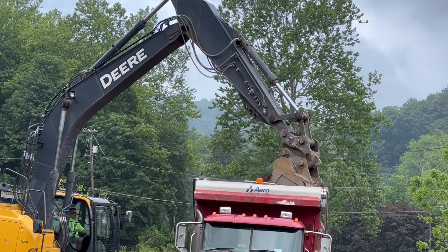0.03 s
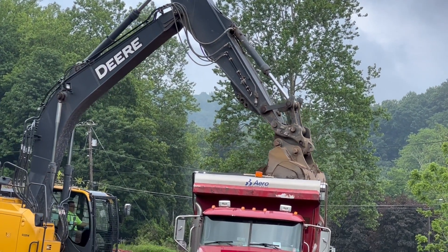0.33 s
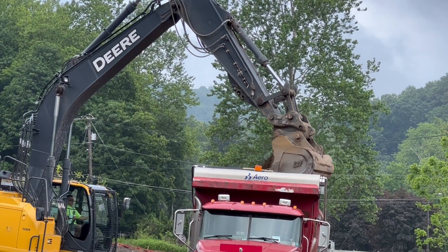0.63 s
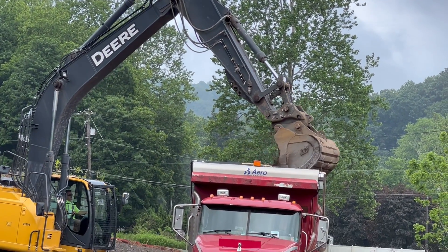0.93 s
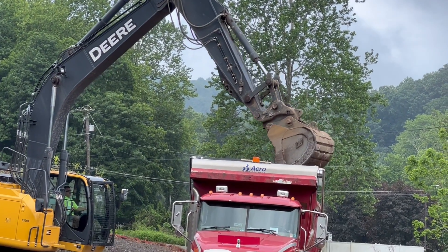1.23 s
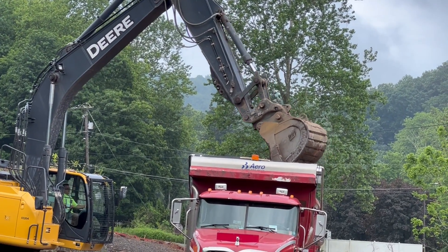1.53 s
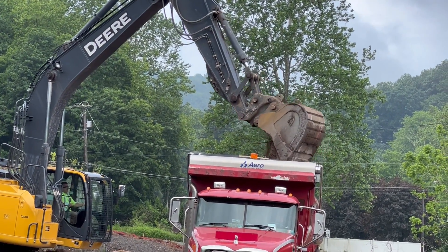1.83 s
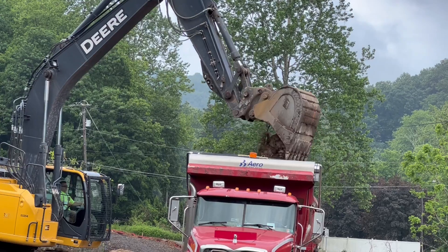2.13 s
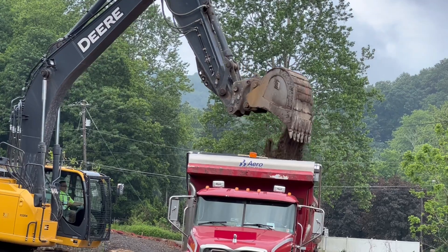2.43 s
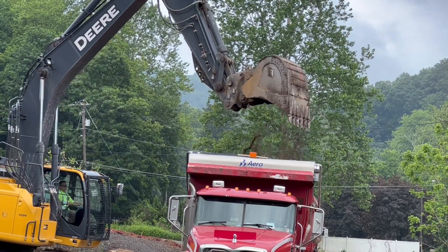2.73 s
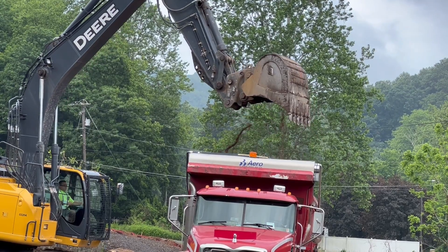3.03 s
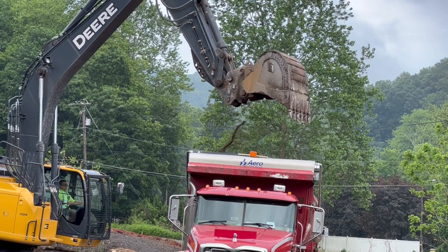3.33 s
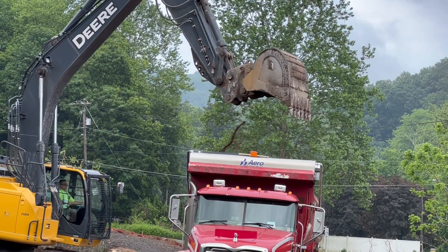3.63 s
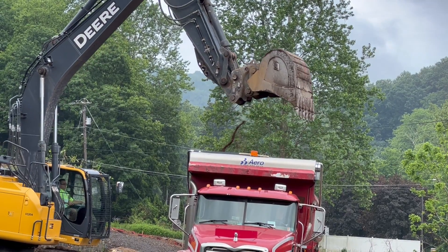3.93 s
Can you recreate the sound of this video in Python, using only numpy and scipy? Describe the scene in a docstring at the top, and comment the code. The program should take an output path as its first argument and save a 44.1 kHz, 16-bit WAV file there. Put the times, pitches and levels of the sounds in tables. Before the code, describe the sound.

An excavator empties dirt into a dump truck outdoors, some way off, over steady diesel engines and a hydraulic whine. At about 1 second clods thud into the steel bed, followed by scattered stone clicks. From 2.7 seconds the bucket clanks and rattles with a thin jingle while the last soil pours with more thuds. The whine weakens, the clanking ends near 3.4 seconds and the pour fades by 4.

```python
"""An excavator empties its bucket into a dump truck, heard from some way off, straight ahead.
Clods thud into the steel bed and stones click on it; then the bucket swings fully open, clanks and
rattles on its pins, and the last soil pours out. Behind it both diesels run and the hydraulic pump
whines under the load. Outdoors, with a faint return from the trees, on a two-port stereo microphone."""
import sys
import numpy as np
from scipy import signal
from scipy.fft import rfft, irfft
from scipy.io import wavfile
from scipy.ndimage import map_coordinates

SR = 44100
rng = np.random.default_rng(int(sys.argv[2]) if len(sys.argv) > 2 else 0)


def store_pcm(level_fs):
    """Save levels as 16-bit WAV."""
    pcm = np.round(np.clip(level_fs, -1, 1) * 32767).astype(np.int16)
    wavfile.write(sys.argv[1], SR, np.atleast_2d(pcm).T)


N = 4 * SR
TIME, HIT_TIME = np.arange(N) / SR, np.arange(SR * 3 // 4) / SR
GRAINS_PER_S = 2500


def amp(db):
    """Decibels to gain."""
    return 10 ** (np.asarray(db) / 20)

def unit(x):
    """Scales to rms 1."""
    return x / np.sqrt(np.mean(x ** 2) + 1e-20)

def unit_hit(x):
    """Scales a hit to the energy of 30 ms at rms 1."""
    return x / np.sqrt(np.sum(x ** 2) / (.03 * SR) + 1e-20)

def curve(rows, column=1):
    """One column of a time table, for every sample."""
    rows = np.array(rows)
    return np.interp(TIME, rows[:, 0], rows[:, column])

def add(mix, start, sound):
    """Mixes a sound in, start seconds from the beginning."""
    part = mix[round(start * SR):][:len(sound)]
    part += sound[:len(part)]

def shape(x, gain_db):
    """Minimum-phase filter that follows gain_db(Hz)."""
    size = 8192
    hz = abs(np.fft.fftfreq(size, 1 / SR)) + 1
    log_gain = np.log(amp(np.maximum(gain_db(hz), -100)))
    taps = np.fft.ifft(np.exp(np.conj(signal.hilbert(log_gain)))).real[:size // 2]
    return signal.fftconvolve(x, taps)[:len(x)]

def colour(x, points):
    """Filters by a table of (Hz, dB)."""
    hz, db = np.transpose(points)
    return shape(x, lambda f: np.interp(np.log(f), np.log(hz), db))

def resonate(x, hz, octaves):
    """One resonance with steep skirts."""
    return shape(x, lambda f: -20 * np.log10(1 + (np.log2(f / hz) / octaves / 2) ** 2 * 2))

def drift(per_s):
    """Smooth random wander of rms 1."""
    knots = rng.standard_normal(400)
    return unit(map_coordinates(knots, [TIME * per_s + 10], order=3, mode="wrap"))

def grains(size, per_s):
    """Random clicks of uneven strength."""
    clicks = (rng.random(size) < per_s / SR) * rng.choice([-1, 1], size)
    return clicks * amp(3 * np.minimum(rng.exponential(1, size), 4))

def fade(rise_s, t60):
    """Linear rise, then a fall of 60 dB in t60 seconds."""
    decay = np.exp(-np.log(1000) * np.maximum(HIT_TIME - rise_s, 0) / t60)
    return np.minimum(HIT_TIME / rise_s, 1) * decay

def burst(rise_s, t60):
    """A short, dying shower of tiny contacts."""
    return grains(len(HIT_TIME), GRAINS_PER_S) * fade(rise_s, t60)

def ring(modes, rise_s=.007):
    """The modes of a steel body after one blow."""
    return unit_hit(sum(amp(db) * fade(rise_s, t60) * np.sin(2 * np.pi * (hz * HIT_TIME + rng.random()))
                        for hz, db, t60 in modes))

def tone(hz, waver_hz=1.34, waver_db=2):
    """A machine tone that wavers in pitch and level."""
    level = np.sqrt(2) * amp(waver_db * drift(9.8))
    cycles = np.cumsum(hz + waver_hz * drift(12)) / SR
    return level * np.sin(2 * np.pi * (cycles + rng.random()))


def tree_echo(x):
    """A dull, faint return from the trees."""
    tail = colour(burst(rise_s=.084, t60=.5), [(100, -14.5), (1000, -11.5), (4000, -19.5), (10000, -15.5)])
    return amp(-22) * signal.fftconvolve(x, tail / np.linalg.norm(tail))[:N]


# The diesels' steady tones. Each row: pitch in Hz, level in dB.
ENGINE_TONES = [(49.8, -27.5), (84, -34.5), (151.8, -26.5), (167.5, -40.5), (186, -36.5), (209.5, -36),
                (250.5, -36), (641, -53.5)]
# Roar of engines and fans. Each row: frequency in Hz, relative level in dB.
ROAR_SPECTRUM = [(21, -25), (34, -47), (45.5, -10), (81, 1.9), (116, 0.8), (181, -6), (241, -7.5),
                 (322, -15.5), (452, -19), (562, -26), (802, -18.5), (1255, -21.5), (1905, -24.6),
                 (2405, -29.5), (3405, -32), (4805, -43), (8305, -45), (9505, -49.5), (12005, -41),
                 (15505, -49)]
# The roar's treble over time. Each row: time in seconds, gain in dB.
ROAR_TREBLE = [(0, -0.1), (.9, 0.8), (2, 2), (2.6, 0.2), (3.3, -0.6), (4, 0.7)]

def engines(firing_hz=41.8):
    """Two diesels some way off: tones over a roar whose low end throbs with the firing."""
    throb = 1 + .48 * np.sin(2 * np.pi * np.cumsum(firing_hz + 2.83 * drift(8)) / SR)
    roar = unit(colour(rng.standard_normal(N), ROAR_SPECTRUM))
    low = signal.sosfilt(signal.butter(1, 700, fs=SR, output="sos"), roar)
    flicker = amp(curve(ROAR_TREBLE) + .88 * drift(70))
    hum = sum(amp(db) * tone(hz) for hz, db in ENGINE_TONES)
    return amp(-24.6) * (low * throb + (roar - low) * flicker) + hum


# The pump under load. Each row: time in seconds, pitch in Hz, then whine, upper whine and hiss in dB.
PUMP_LOAD = [(0, 416, -32.5, -46, -47.2), (.12, 416.8, -32.5, -46, -47.2), (.4, 417.8, -33.5, -43, -65),
             (.7, 419.1, -34, -46, -55), (.95, 419.8, -32, -40.5, -45.5), (1.25, 421.1, -35, -36, -49),
             (1.5, 420.2, -33.5, -32.5, -53), (1.7, 420.5, -32, -35.5, -52),
             (1.95, 421.1, -31.5, -47.2, -50), (2.27, 421.1, -34.8, -48, -49.2),
             (2.5, 422.7, -38.8, -46, -60), (3.2, 416.2, -48, -60.2, -70.2),
             (4, 414.3, -41.2, -46.2, -74.2)]
# Oil in the valves. Each row: frequency in Hz, relative level in dB.
OIL_SPECTRUM = [(5500, -43), (7000, -5), (7700, -18), (8200, 1), (8800, -12.5), (10000, -8.5)]

def hydraulics():
    """Two fluttering pump whines, the upper with a partial a fifth above; oil hisses and whistles."""
    hz, whine_db, upper_db, hiss_db = (curve(PUMP_LOAD, column) for column in range(1, 5))
    hz = hz + 3.49 * drift(46)
    flow = rng.standard_normal(N)
    whistle = amp(-9.5) * unit(resonate(flow, hz=8190, octaves=.012))
    oil = unit(colour(flow, OIL_SPECTRUM)) + whistle
    upper_hz = 1.143 * hz
    upper_whine = tone(upper_hz) + amp(-6) * tone(1.5 * upper_hz)
    return amp(whine_db) * tone(hz) + amp(upper_db) * upper_whine + amp(hiss_db) * oil


# A thin high tinkle near 11.5 kHz while the bucket clanks. Each row: time in seconds, level in dB.
SIZZLE_LEVEL = [(2.65, -88), (2.668, -41), (2.78, -38.5), (2.92, -45), (3.03, -42), (3.15, -49),
                (3.24, -44), (3.28, -62), (3.44, -61), (3.55, -76), (3.7, -58), (3.8, -76), (4, -65)]

def high_sizzle(hz=11520):
    """A thin tinkle near 11.5 kHz, in quick flickers, with some sizzle around it."""
    tink = rng.standard_normal(len(HIT_TIME)) * fade(rise_s=1 / SR, t60=.06)
    shake = signal.fftconvolve(grains(N, per_s=400), tink)[:N]
    tinkle = unit(resonate(shake, hz, octaves=.018))
    sizzle = amp(-7) * unit(resonate(shake, hz, octaves=.09))
    return amp(curve(SIZZLE_LEVEL)) * (tinkle + sizzle)


# The last soil leaving the bucket. Each row: time in seconds, level in dB.
POUR_LEVEL = [(2.66, -29), (2.75, -18.5), (2.92, -20), (3.1, -19), (3.3, -26), (3.5, -26.5), (3.7, -30),
              (4, -35)]
# Loose soil landing. Each row: frequency in Hz, relative level in dB.
SOIL_SPECTRUM = [(40, 5.5), (65, 5), (150, -3), (420, 0.5), (700, -3), (1100, -8.5), (2000, -20.5),
                 (4500, -32), (7000, -37), (12000, -45)]

def soil_pour():
    """Soil patters in clumps onto the heap in the truck."""
    patter = grains(N, GRAINS_PER_S) * amp(2 * drift(45))
    return amp(curve(POUR_LEVEL)) * unit(colour(patter, SOIL_SPECTRUM))


# Stones striking the bed. Each row: start in seconds, level in dB, pitch in Hz,
# bandwidth in octaves, t60 of the contact in seconds.
STONE_HITS = [(1.066, -27, 590, 0.065, 0.064), (1.183, -28, 792, 0.045, .07),
              (1.627, -30, 1720, 0.12, 0.04), (1.628, -30, 1080, 0.33, .05),
              (1.917, -38, 1770, 0.077, 0.039), (1.967, -27.5, 990, 0.18, 0.004),
              (2.059, -33.5, 1095, 0.41, 0.026), (2.103, -40, 1207, 0.22, 0.022),
              (2.185, -39, 1770, 0.069, 0.02), (2.251, -31.5, 720, 0.067, 0.057),
              (2.253, -35, 1530, 0.14, 0.029), (2.441, -35, 1860, 0.077, 0.056),
              (2.451, -27, 830, 0.28, 0.045), (2.451, -31.5, 397, 0.15, .03), (2.533, -40, 1840, .1, 0.022),
              (2.568, -28, 960, 0.35, 0.18), (2.609, -30.5, 1830, 0.061, 0.046),
              (2.611, -28.5, 1150, 0.25, 0.058), (2.612, -26, 730, 0.074, .05),
              (3.03, -21.5, 630, 0.036, 0.071), (3.101, -23.5, 925, 0.013, 0.16),
              (3.197, -31.5, 820, 0.11, 0.049), (3.592, -31, 1980, .09, 0.067),
              (3.688, -34.5, 940, 0.32, 0.065)]

def stones():
    """Dry clicks on steel, each with one resonance, their top lost on the way to the microphone."""
    out = np.zeros(N)
    distance = signal.butter(6, 2530, fs=SR, output="sos")
    for start, db, hz, octaves, t60 in STONE_HITS:
        click = resonate(burst(.00061, t60), hz, octaves)
        add(out, start, amp(db) * unit_hit(signal.sosfilt(distance, click)))
    return out


def thud(hz, octaves=.51, steepness=27.6):
    """The dull push of a soft lump; heavier lumps are deeper."""
    push = burst(rise_s=.006, t60=.125)
    dull = shape(push, lambda f: -steepness * np.log10(1 + (np.log2(f / hz) / octaves / 2) ** 4 * 2))
    return unit_hit(dull)


# Clods landing. Each row: start in seconds, thud in dB, thud pitch in Hz, boom in dB, crumble in dB.
CLOD_HITS = [(1.062, -34, 130, -38, -31), (1.068, -12.3, 104, -25, -24.5), (1.091, -9.5, 141, -27, -21.5),
             (1.118, -17, 200, -12, -21.5), (1.147, -31, 130, -17.5, -29), (1.178, -23, 170, -28, -31),
             (1.235, -15, 106, -20.5, -33), (1.268, -20.5, 191, -22, -42), (1.321, -30, 130, -22.5, -28.5),
             (1.359, -22.5, 101, -36, -38), (1.905, -21, 130, -43, -37), (1.93, -22, 158, -44, -48),
             (2.261, -24, 111, -31, -47), (2.679, -27, 130, -25, -28), (2.719, -18.5, 145, -28, -34),
             (2.818, -19, 130, -18, -24), (2.918, -17, 149, -14, -30.5), (2.986, -20.5, 168, -24, -31),
             (3.005, -13.5, 62, -22, -25), (3.185, -23, 110, -30, -31)]
# The truck's steel bed. Each row: mode in Hz, relative level in dB, t60 in seconds.
BED_MODES = [(107, -3.5, 0.1), (192.3, -0.5, 0.21), (273.2, -5, 0.36), (314, -2.5, 0.15), (522, -28, 0.31),
             (701, -27, 0.41), (780, -27, 0.24)]
# A clod breaking, and the grit it sheds. Each row: frequency in Hz, relative level in dB.
CRUMBLE_SPECTRUM = [(201, -16), (401, -9.2), (561, 3.5), (901, -5), (1301, -2.1), (1551, -9.5),
                    (1801, -5.5), (2501, -16.5), (4501, -31), (8001, -37), (12001, -43.1), (16001, -61.1)]
GRIT_SPECTRUM = [(1500, -5), (3000, 1.5), (4500, -8), (7500, -10), (12000, -21), (16000, -34)]

def clods():
    """Each clod thuds, sets the bed booming, breaks up and sheds a trickle of grit."""
    out = np.zeros(N)
    for start, thud_db, thud_hz, boom_db, crumble_db in CLOD_HITS:
        add(out, start, amp(thud_db) * thud(thud_hz))
        add(out, start, amp(boom_db) * ring(BED_MODES))
        crumble = unit_hit(colour(burst(rise_s=.015, t60=.125), CRUMBLE_SPECTRUM))
        grit = unit_hit(colour(burst(rise_s=.015, t60=1), GRIT_SPECTRUM))
        add(out, start, amp(crumble_db) * (crumble + amp(-17) * grit))
    return out


# The bucket knocking on its stop and pins. Each row: start in seconds, then body, clang and clash in dB.
BUCKET_KNOCKS = [(2.659, -22, -20, -45), (2.672, -12, -19, -34), (2.725, -15, -12.5, -32),
                 (2.753, -14.2, -20, -35.5), (2.775, -31, -21, -46), (2.802, -26, -19, -37),
                 (2.812, -19.5, -17, -21.5), (2.843, -20, -23, -39), (2.866, -35, -23, -34.5),
                 (2.892, -18, -33, -56), (2.956, -23, -24, -41), (3.005, -39, -21, -37),
                 (3.027, -17.5, -22, -46), (3.083, -23, -22, -45), (3.111, -22, -33, -40.5),
                 (3.18, -24.5, -32, -51), (3.202, -25.5, -41, -56), (3.25, -32, -30.5, -49),
                 (3.328, -23.5, -35, -58), (3.397, -29, -30, -60)]
# The bucket's body, and its pins. Each row: mode in Hz, relative level in dB, t60 in seconds.
BUCKET_MODES = [(345, -10.5, 0.21), (391.3, -7, 0.37), (410, -0.5, 0.24), (431.4, -7.5, 0.22),
                (475.5, -9.5, 0.2), (529, -8.5, 0.2), (636, -13.5, 0.3), (755, -19, 0.46),
                (814, -19.5, 0.22), (909, -22, 0.21), (1056, -24, 0.18), (1170, -24, 0.29),
                (1218, -19, 0.098), (1770, -22, 0.33)]
PIN_MODES = [(3352, -4, 0.23), (3530, -6, .18), (3910, 0, 0.16), (4150, 1, 0.17), (4310, 2, 0.18),
             (5606, 3, 0.13), (5905, 0, 0.12), (6140, -5, .1), (6702, -2, .11), (6850, -3, 0.1)]
# The plates' clang, and the bright clash above it. Each row: frequency in Hz, relative level in dB.
CLANG_SPECTRUM = [(151, -18.5), (301, 6.5), (521, 6), (751, 0.5), (1301, -1.8), (1901, -4.2), (2701, -11),
                  (3501, -16), (4801, -35), (9001, -41)]
CLASH_SPECTRUM = [(1500, -2.5), (2800, -9), (3500, 3), (4300, -2), (4800, -5.5), (5900, 1.5), (6900, 1),
                  (8000, -9), (9300, -15.5), (12000, -18), (16000, -33)]

def bucket(rise_s=.003):
    """A strike and its chatter ring the bucket's low modes, its plates and its pins."""
    out = np.zeros(N)
    for start, body_db, clang_db, clash_db in BUCKET_KNOCKS:
        contact = burst(rise_s, t60=.04)
        add(contact, rise_s, amp([-3.5]) * np.linalg.norm(contact))  # the strike, at the chatter's peak
        clang = signal.fftconvolve(contact, burst(rise_s, t60=.13))[:len(HIT_TIME)]
        clash = signal.fftconvolve(contact, burst(rise_s, t60=.085))[:len(HIT_TIME)]
        add(out, start, amp(body_db) * ring(BUCKET_MODES))
        add(out, start, amp(clang_db) * unit_hit(colour(clang, CLANG_SPECTRUM)))
        pins = amp(-9) * ring(PIN_MODES)
        add(out, start, amp(clash_db) * (unit_hit(colour(clash, CLASH_SPECTRUM)) + pins))
    return out


def scattered(x):
    """Sound scattered around the site: the same spectrum with its phases jumbled."""
    spectra = signal.stft(x, nperseg=512)[2]
    jumbled = spectra * np.exp(2j * np.pi * rng.random(spectra.shape))
    return signal.istft(jumbled, nperseg=512)[1][:N] * np.sqrt(2)


# Phase between the microphone's ports. Each row: frequency in Hz, lead of the left port in radians.
LEFT_LEAD = [(1000, 0), (2300, .2), (3200, .7), (4500, .45), (5500, 0), (8600, 0), (9100, -1.5),
             (10050, -3.1), (10330, -3.17), (11000, -4.6), (11850, -6.25), (12400, -6.35), (13000, -7.9),
             (13250, -9.4), (14350, -9.45), (14800, -11.2), (15250, -12.55)]

def microphone_ports(x):
    """Two ports hear one sound with a difference in phase that grows in the top treble."""
    hz, radians = np.transpose(LEFT_LEAD)
    lead = np.interp(np.log(np.fft.rfftfreq(N, 1 / SR) + 1), np.log(hz), radians)
    turn = np.exp(.5j * lead)  # half to each port
    return irfft(rfft(x) * np.array([turn, turn.conj()]), N)


# Scattered sound reaching the microphone from the sides. Each row: frequency in Hz, gain in dB.
SIDE_GAIN = [(30, -36), (60, -27), (125, -18), (250, -15.5), (1000, -15.5), (2000, -14), (5000, -19),
             (8000, -15), (12000, -13)]

def scene():
    """Both machines stand straight ahead of the microphone; scattered sound gives a little width."""
    dumping = clods() + stones() + bucket() + soil_pour()
    mid = dumping + tree_echo(dumping) + high_sizzle() + engines() + hydraulics()
    side = colour(scattered(mid), SIDE_GAIN)
    return microphone_ports(mid) + np.array([side, -side])


# The microphone's response, dull at the top. Each row: frequency in Hz, gain in dB.
MIC_RESPONSE = [(9000, -2), (9600, -0.5), (10200, -2.5), (11000, -6), (12000, -13), (13000, -17),
                (14000, -13), (15000, -11)]

def record(dry, low_cut_hz=55, ceiling=.88, top_hz=15800):
    """Microphone colour, low cut, soft overload, then the band limit."""
    heard = np.array([colour(channel, MIC_RESPONSE) for channel in dry])
    heard = signal.sosfilt(signal.butter(4, low_cut_hz, "high", fs=SR, output="sos"), heard)
    heard = heard / (1 + (heard / ceiling) ** 8) ** (1 / 8)
    band_limit = signal.firwin(511, top_hz, window=("kaiser", 9), fs=SR)
    return signal.oaconvolve(heard, band_limit[None], "same")


dry = scene()
out = record(dry)
store_pcm(out)
```